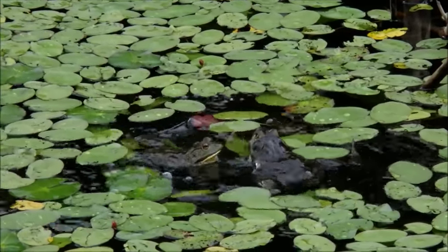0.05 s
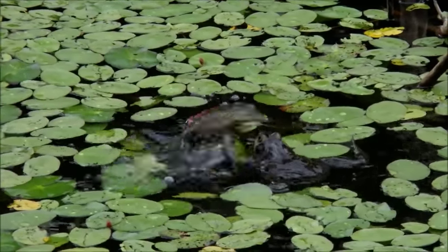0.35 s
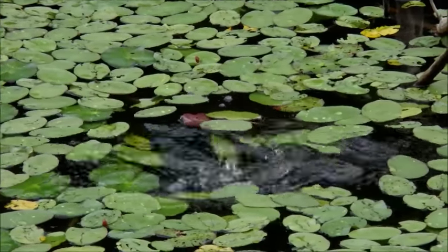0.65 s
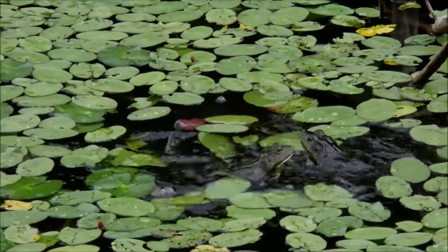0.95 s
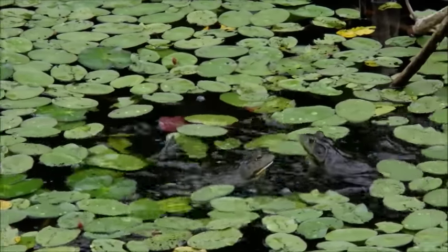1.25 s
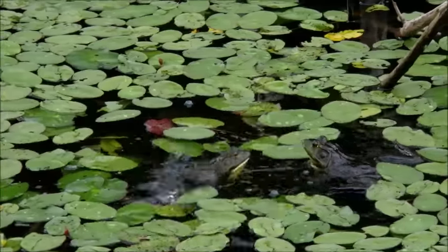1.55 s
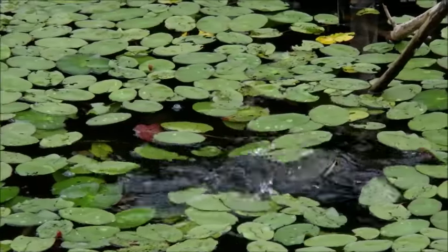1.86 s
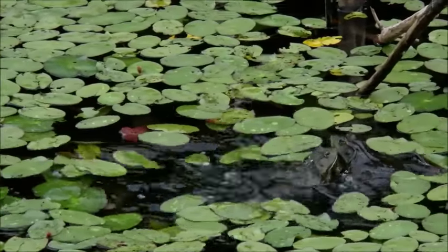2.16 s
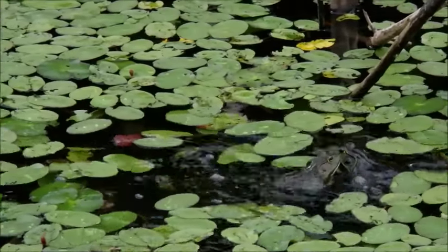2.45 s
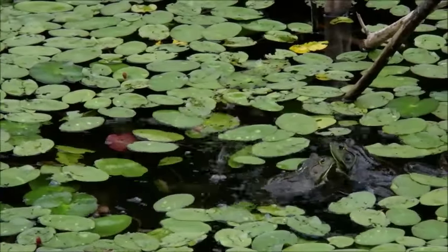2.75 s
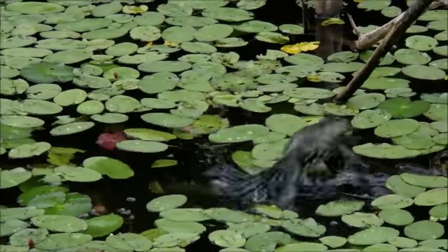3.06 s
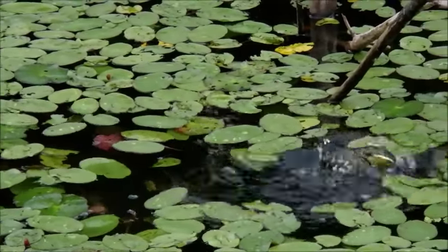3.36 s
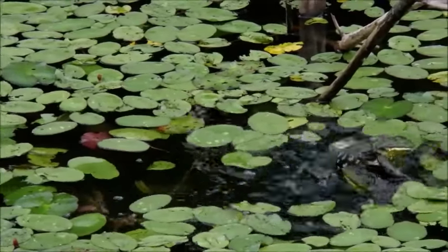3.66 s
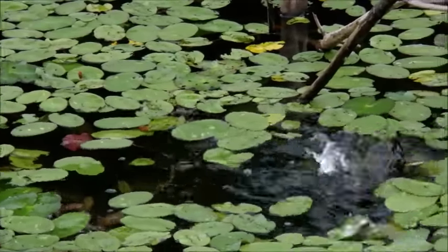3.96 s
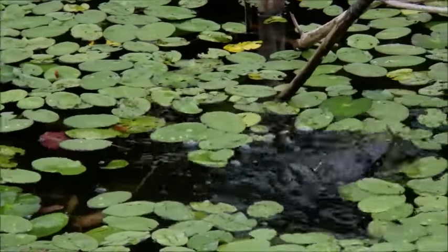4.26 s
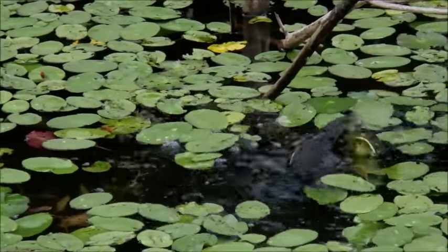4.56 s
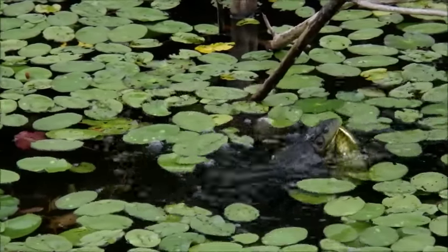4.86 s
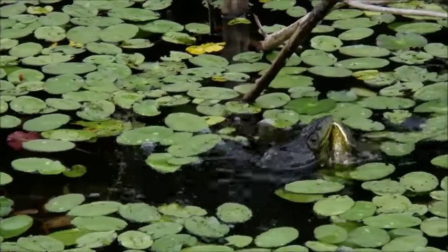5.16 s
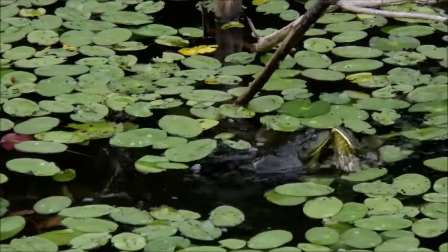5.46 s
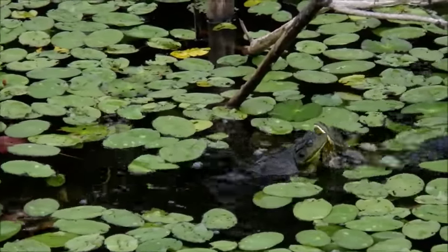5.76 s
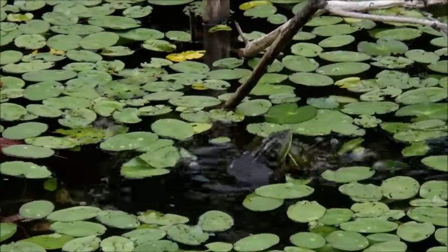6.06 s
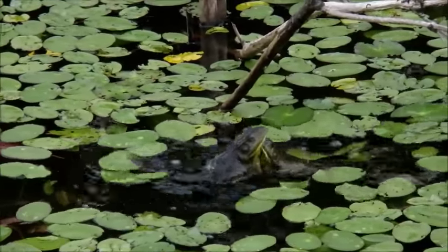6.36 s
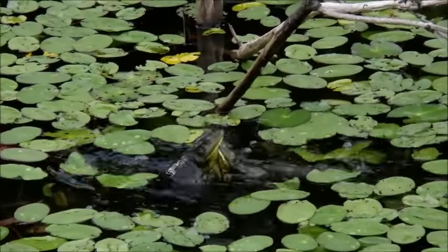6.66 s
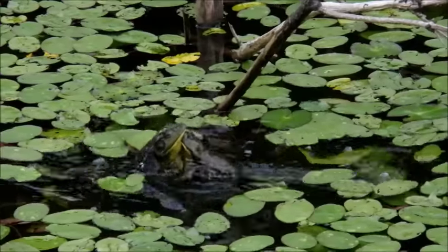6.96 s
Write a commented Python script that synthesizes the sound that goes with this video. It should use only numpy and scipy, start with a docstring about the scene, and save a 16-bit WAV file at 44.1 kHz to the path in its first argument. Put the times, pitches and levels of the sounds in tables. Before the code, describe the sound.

Gusts of wind buffet the microphone while frogs make small splashes in a pond, over a steady hiss of leaves and a distant hum.

```python
"""A lily pond, heard from a hand-held camera. Some metres off, two frogs wrestle among the pads:
skin slaps water, spray falls back, trapped air rings. Foliage hisses all round over a far hum.
Close up, gusts buffet the two microphone ports one by one, and the hardest buffets make the
camera's limiter duck everything, which then creeps back."""
import sys
import numpy as np
from scipy import signal
from scipy.fft import rfft, irfft, next_fast_len
from scipy.io import wavfile
from scipy.ndimage import uniform_filter1d, minimum_filter1d, map_coordinates

SR = 44100
rng = np.random.default_rng(int(sys.argv[2]) if len(sys.argv) > 2 else 0)


def inscribe(sig):
    """Save sig as 16-bit PCM at rate SR to the path in sys.argv[1].

    A 1-D sig is mono; a 2-D sig holds one channel per row.
    Samples are clipped to [-1, 1] before scaling.
    """
    pcm = np.round(np.clip(np.atleast_2d(sig).T, -1, 1) * 32767)
    wavfile.write(sys.argv[1], SR, pcm.astype(np.int16))


N = 309141
TIME = np.arange(N) / SR
FREQS = np.arange(N // 2 + 1) * SR / N
TOP_HZ = 15750  # upper edge of the camera's sound

# Frogs slapping the water. Each row: start in seconds, level in dB, centre in Hz, decay in seconds.
FROG_SLAPS = [(0.729, -31, 5400, .0025), (0.747, -26.5, 6500, 0.0012), (0.748, -27.5, 1940, 0.00076),
              (0.746, -28, 690, 0.0025), (0.759, -27.5, 4800, .002), (0.766, -34, 2300, .0012),
              (0.782, -30, 2590, .0012), (0.832, -30.5, 6550, 0.00075), (0.834, -31, 3600, .0015),
              (2.075, -30, 4677, 0.012), (2.079, -17.5, 6900, 0.00064), (3.559, -22.5, 3060, 0.00091),
              (3.57, -29.5, 5000, 0.003), (3.594, -32, 9010, 0.00074), (3.612, -33, 4660, 0.0044),
              (3.633, -22, 7608, 0.0012), (3.634, -22, 5100, 0.0011), (4.207, -30, 3560, 0.0021),
              (4.241, -29, 4500, 0.0013), (4.287, -28.5, 3225, .0012), (4.31, -40, 5140, 0.015),
              (5.262, -31.5, 6600, 0.0033)]
# Air pockets closing. Each row: start in seconds, level in dB, pitch in Hz, rise in octaves per decay.
AIR_POCKETS = [(0.744, -39.5, 312, .05), (0.779, -40, 1420, 0.14), (0.781, -35, 1980, 0.11),
               (0.815, -46, 1440, .03), (0.834, -41, 3220, 0.039), (0.878, -34, 2085, .02),
               (1.780, -46, 2110, .02), (3.357, -32, 5470, 0.019), (3.363, -42, 2105, 0.03),
               (3.623, -40, 2830, 0.047), (3.632, -31, 4053, .02), (4.159, -37.5, 834, 0.14),
               (4.171, -45, 1089, 0.26), (4.208, -45.5, 2056, 0.03), (4.317, -45.5, 2626, 0.019)]

# Gusts on the microphone. Each row: start in seconds, length in seconds, level at the windward port
# in dB, left minus right in dB.
GUSTS = [(1.266, 0.18, -54.5, -13), (1.576, 0.044, -42, -10), (1.638, 0.047, -31, -9),
         (1.701, 0.038, -34, -3), (1.79, 0.12, -42, -2), (1.939, 0.03, -36, -12.5), (2.139, 0.033, -27, 2),
         (2.188, .17, -22.5, -14), (2.384, 0.13, -22.5, 3), (2.533, 0.05, -17, 11), (2.581, 0.069, -31, 8),
         (2.712, 0.023, -15.5, 18), (2.758, 0.061, -14.5, 13.5), (2.835, 0.036, -17, -8),
         (2.883, 0.074, -21, 14), (2.983, 0.039, -26, 8), (3.029, 0.064, -35, 5.5), (3.144, 0.072, -24, 18),
         (3.225, .15, -29, 0), (3.39, .15, -36, -6), (3.57, 0.063, -26, 0), (3.639, .14, -20.5, 3),
         (3.815, 0.043, -26.5, 7), (3.861, .07, -33, 13.5), (3.933, .12, -20.5, 8.5),
         (4.077, .066, -32, -2), (4.186, 0.039, -27, -11.5), (4.239, 0.061, -33, -5),
         (4.296, 0.075, -22.5, -12), (4.387, 0.11, -20, 9), (4.494, 0.086, -26, -5),
         (4.604, 0.06435, -20, 6), (4.699, .085, -23, 3), (4.819, 0.23, -34, -6), (5.103, 0.032, -26, -7),
         (5.152, 0.098, -29, -5), (5.508, 0.029, -36, -17.5), (5.563, 0.044, -38, 8),
         (5.615, 0.079, -34, 6), (5.758, 0.046, -37.5, 4), (5.801, .025, -31.5, -8.5),
         (5.86, 0.11, -40, -3), (5.987, 0.11, -29, 5.5), (6.106, 0.066, -40, 4), (6.209, 0.031, -38, 2.5),
         (6.278, 0.064, -47.5, -2.5), (6.52, 0.094, -48.5, 5), (6.74, 0.032, -40, 3),
         (6.78, 0.056, -40, -4.5)]
# The hardest eddies to hit a port. Each row: time in seconds, level in dB, pitch in Hz,
# left minus right in dB.
BUFFETS = [(0.083, -37, 120, -23), (.182, -38, 130, -14), (0.226, -35, 130, -22), (0.282, -36, 118, -17),
           (0.547, -33, 125, -23), (0.576, -36, 120, -16), (1.65, -27, 124, -18), (1.659, -26, 201, -20),
           (1.72, -24, 228, -11), (2.005, -20, 169, -30), (2.085, -18.5, 225, 25), (2.103, -16.5, 232, -17),
           (2.144, -24, 190, 8), (2.168, -4.5, 230, -20), (2.174, -1.5, 278.9, -35), (2.278, -11, 186, -16),
           (2.396, -9.5, 170.1, -15), (2.422, -10.5, 269.8, 12), (2.431, -8, 278, 16),
           (2.464, -9.5, 170.2, 21), (2.476, -5.5, 282, 29), (2.487, -5.5, 292.9, 16), (2.501, 5, 328, 3),
           (2.514, -2, 269, 5.5), (2.533, -8.5, 291.6, 19), (2.548, -9.5, 232, -10),
           (2.573, -10.5, 421, 21), (2.631, -11, 400, 14), (2.638, -6, 259, 11), (2.68, -8.5, 310, 25.5),
           (2.699, -16.5, 360, 15), (2.721, -10.5, 212.1, 24), (2.741, -6.5, 363.5, 18),
           (2.769, -8.5, 348, 10), (2.804, -5.5, 313.2, 4.5), (2.816, -4.5, 383.4, 8.5),
           (2.843, -11.5, 348, -16), (2.869, -4.5, 211.5, -15.5), (2.908, -5.5, 249, 22),
           (2.935, -8, 410, 21.5), (2.956, -11, 315, 16), (3.064, -19, 180.5, 16.5),
           (3.185, -12.5, 150.7, 18.5), (3.239, -17, 150.2, -1.5), (3.368, -12.5, 189.1, -25),
           (3.582, -19.5, 199.5, 2), (3.645, -12.5, 301, 26), (3.654, -0.8, 270, 22), (3.673, -8, 229, -6),
           (3.72, -7, 195, 6), (3.757, -9, 190.4, 15.5), (3.94, -9, 189.2, 24), (3.99, -6, 198.7, 20),
           (4.004, -11, 210.1, 11.5), (4.047, -12, 230.6, -13.5), (4.19, -22.5, 151.1, -16),
           (4.215, -15, 213.3, -25), (4.314, -8, 197.6, -25), (4.336, -15, 230.5, -18),
           (4.365, -13.5, 257.4, -17), (4.4, -1.5, 320, 32), (4.434, -5, 291.3, 8), (4.442, 3.5, 364, 30),
           (4.478, -9.5, 358, 19.5), (4.607, -7, 321.2, -13), (4.657, -7.5, 187.8, 21.5),
           (4.708, -10.5, 190, 18), (4.783, -18, 169.9, -21), (5.012, -14, 211.5, 9), (5.114, -1, 299, -26),
           (5.187, -15, 201, -13.5), (5.228, -14, 260, -8), (5.543, -19.5, 160.1, -28),
           (5.73, -19.5, 150.1, 7), (5.816, -16.5, 180.8, -7.5), (5.907, -13.5, 258.7, 26),
           (6.001, -23, 279.3, 16), (6.013, -10.5, 238.3, 22), (6.07, -16, 209.2, 18),
           (6.23, -25, 178.8, 9), (6.42, -35.5, 138.4, 10), (6.471, -29, 177.3, -8),
           (6.594, -32, 138.8, 19.5), (6.736, -26.5, 159.4, 17), (6.773, -20, 158.1, -6),
           (6.798, -19.5, 167.9, -18)]
# Wind rumble at its usual speed. Each row: frequency in Hz, relative level in dB.
WIND_SPECTRUM = [(20, -24), (55, -1), (95, 2.5), (170, 2), (260, -8), (380, -18.5), (520, -32.5),
                 (750, -52), (1400, -63), (4000, -100)]
# The snap of an overloaded port. Each row: frequency in Hz, relative level in dB.
SNAP_SPECTRUM = [(300, -18), (750, 18), (1400, -3), (3200, -1), (6000, -11), (15000, -25)]

# Foliage all round. Each row: frequency in Hz, relative level in dB.
LEAF_SPECTRUM = [(740, -56), (1250, -10), (1560, -6.5), (1760, -4.5), (1920, -5), (2130, -3.5), (2320, -5),
                 (3160, -1), (3480, 2.5), (3910, 3), (6260, 1.5), (8620, -2), (12900, -14), (14700, -13.5),
                 (16000, -22)]
# The breeze in that foliage. Each row: time in seconds, hiss level in dB.
LEAF_LEVEL = [(0, -47), (.9, -47), (1.9, -48), (3.5, -45.5), (4, -48.5), (5, -47), (5.7, -49.5),
              (6.3, -50.5), (7, -50)]
# How alike the hiss is at the two ports. Each row: frequency in Hz, correlation.
LEAF_LIKENESS = [(1000, 0.92), (2400, 0.68), (4400, 0.71), (8000, 0.45), (15000, 0.058)]
# The far hum before it rises in pitch. Each row: frequency in Hz, relative level in dB.
HUM_SPECTRUM = [(30, -2), (70, 7.5), (240, 0), (315, 4), (430, -2), (510, 3.5), (605, 6), (690, 5),
                (790, -3), (930, 1.5), (1010, 1.5), (1160, -8.5), (1600, -17)]
# The hum's slow rise and fall. Each row: time in seconds, level in dB.
HUM_LEVEL = [(0, -51.5), (.4, -51), (.55, -51), (1.3, -51.5), (1.7, -52.5), (3.5, -49.5), (4, -52.5),
             (5, -51), (6.2, -53.5), (6.33, -50), (6.37, -54), (7, -52)]
# Faint tones in the hum. Each row: pitch in Hz, level before the swell in dB.
WHINE_TONES = [(316, -68.5), (592, -60), (651, -64), (947, -72), (1012, -67)]
# The tones swell and recede together. Each row: time in seconds, gain in dB.
WHINE_SWELL = [(0, -8), (.2, 0.5), (.47, 7.5), (.6, -7), (1.5, 2), (2.5, -26), (7, -8)]


def frogs(spray_db=-24, spray_s=0.057, drop_hz=4200, drop_octaves=0.52, drop_cycles=4, drops=12):
    """Frogs some metres off: each slap throws droplets that fall back; trapped air rings."""
    out = np.zeros(N)
    for start, db, hz, decay in FROG_SLAPS:
        add(out, start, undb(db) * slap(hz, decay))
        for late, pitch, size in rng.standard_normal((drops, 3)):
            ring_hz = min(drop_hz * 2 ** (pitch * drop_octaves), TOP_HZ)
            droplet = bubble(ring_hz, drop_cycles / ring_hz, rise=0.017)
            add(out, start + spray_s * abs(late), undb(db + spray_db + 0.98 * size) * droplet)
    for start, db, hz, rise in AIR_POCKETS:
        decay = 0.0047 * (2000 / hz) ** 0.45  # smaller bubbles die sooner
        add(out, start, undb(db) * bubble(hz, decay, rise))
    return out


def slap(hz, decay, spread=1.46, rise_s=0.00016, wash_db=-23, wash_s=0.021):
    """A wet crack as skin meets water, then a short wash."""
    t = np.arange(SR // 10) / SR
    band = signal.butter(2, [hz / spread, min(hz * spread, SR * 4 / 9)], "band", fs=SR, output="sos")
    grain = signal.sosfilt(band, rng.standard_normal(len(t)))
    swell = (np.exp(-t / decay) + undb(wash_db) * np.exp(-t / wash_s)) * (1 - np.exp(-t / rise_s))
    return grain / grain.std() / 2 * swell / swell.max()


def bubble(hz, decay, rise):
    """A ringing air pocket; its pitch climbs as it nears the surface."""
    t = np.arange(int(5 * decay * SR)) / SR
    pitch = hz * 2 ** (rise * np.minimum(t / decay, 2))
    envelope = np.exp(-(t / decay) ** 2 / 2) * (1 - np.exp(-t * hz / 2))
    return np.sin(2 * np.pi * np.cumsum(pitch) / SR) * envelope


def tree_echo(sound, echo_db=-15, t60=0.16):
    """The direct sound, plus a faint echo from the trees round the pond, different at each port."""
    t = np.arange(SR // 2) / SR
    tail = rng.standard_normal((2, len(t))) * np.exp(-np.log(1000) * t / t60)
    tail /= np.sqrt(np.sum(tail ** 2, axis=1, keepdims=True))
    echo = signal.fftconvolve(sound[None], tail, axes=1)[:, :N]
    return sound * sides(-0.58) + undb(echo_db) * echo


def gust_levels(lull_db=-70.5, attack_s=0.00703, release_s=0.017, wake_db=-23, wake_s=0.36,
                churn_db=-13.5, churn_s=0.009):
    """Wind in dB at each port: gusts rise, hold and leave a weak wake; air churns round each buffet."""
    force = np.full((2, N), undb(lull_db))
    for start, length, db, pan_db in GUSTS:
        before, after = np.maximum(start - TIME, 0), np.maximum(TIME - start - length, 0)
        attack = np.exp(-before / attack_s)
        release = np.maximum(np.exp(-after / release_s), undb(wake_db) * np.exp(-after / wake_s))
        force = np.maximum(force, undb(db) * attack * release * windward(pan_db))
    for at, db, _, pan_db in BUFFETS:
        churn = undb(db + churn_db) * np.exp(-np.abs(TIME - at) / churn_s)
        force = np.maximum(force, churn * windward(pan_db))
    return 20 * np.log10(force)


def port_rumble(wind_db, usual_db=-30, db_per_octave=21, flutter_db=3.0, cap_db=-17.0):
    """Eddies drift across a port: faster air is louder, up to a point, and higher in pitch."""
    force_db = wind_db + flutter_db * walk(110)
    speed = np.clip(2 ** ((force_db - usual_db) / db_per_octave), 0.6, 2)
    eddies = at_speed(noise(WIND_SPECTRUM, size=2 * N), speed)
    return eddies * undb(np.minimum(force_db, cap_db) + 0.5)


def small_eddies(wind_db, over_db=5, scatter_db=3.5, cap_db=-20, count=150, lead_s=0.02):
    """Lone eddies come at random and stand out of the wind that carries them; a harder one is quicker."""
    out = np.zeros(N)
    t = np.arange(int(2 * lead_s * SR)) / SR - lead_s
    for at, size in zip(rng.uniform(lead_s, TIME[-1], count), rng.standard_normal(count)):
        db = min(wind_db[int(at * SR)] + over_db + scatter_db * size, cap_db)
        hz = 285 * 2 ** (db / 33)  # an octave lower for every 33 dB weaker
        add(out, at - lead_s, rng.choice([-1, 1]) * undb(db) * pressure_swing(t, hz))
    return out


def buffets(overload_db=-6, snap_db=-6, lead_s=0.02):
    """Hard eddies hit mostly one port; the hardest overload it and the crest caves in with a dull snap."""
    out = np.zeros((2, N))
    t = np.arange(int(2 * lead_s * SR)) / SR - lead_s
    colour = undb(over_hz(SNAP_SPECTRUM, np.fft.rfftfreq(len(t), 1 / SR)))
    snap = np.fft.fftshift(irfft(colour, len(t)))
    snap *= undb(snap_db) / snap.max()
    for at, db, hz, pan_db in BUFFETS:
        excess = max(1 - undb(overload_db - db), 0)
        polarity = rng.choice([-1, 1])
        thump = pressure_swing(t, hz) - excess * snap
        add(out, at - lead_s, polarity * undb(db) * thump * windward(pan_db))
    return out


def pressure_swing(t, hz, width_cycles=0.31, skew_rad=0.54):
    """The swing of pressure as one eddy passes the port at t = 0."""
    envelope = np.exp(-(t * hz / width_cycles) ** 2 / 2)
    return np.cos(2 * np.pi * hz * t + skew_rad * rng.standard_normal()) * envelope


def foliage(flutter_db=0.33):
    """Leaves in the breeze: a smooth hiss all round the microphone, a little to the right."""
    hiss = diffuse(LEAF_SPECTRUM, over_hz(LEAF_LIKENESS))
    return hiss * undb(curve(LEAF_LEVEL) + flutter_db * walk(12)) * sides(-1.1)


def far_hum(rise_per_s=0.011, flutter_db=0.42):
    """A hum like distant traffic, nearly alike at both ports, creeping up in pitch."""
    speed = 1 + rise_per_s * TIME
    hum = np.array([at_speed(port, speed) for port in diffuse(HUM_SPECTRUM, likeness=0.94)])
    return hum * undb(curve(HUM_LEVEL) + flutter_db * walk(21))


def far_whine(waver=0.006, flicker_db=2.0):
    """Thin wavering tones, like a far motor."""
    tones = np.zeros(N)
    for hz, db in WHINE_TONES:
        level = undb(db - flicker_db * walk(16))
        pitch = hz * (1 + waver * walk(8))
        tones += level * np.sin(2 * np.pi * np.cumsum(pitch) / SR)
    return tones * undb(curve(WHINE_SWELL))


def whistle(hz=14804, db=-85):
    """A faint steady whistle at the very top of the hiss."""
    return undb(db) * np.sin(2 * np.pi * hz * TIME)


def diffuse(spectrum, likeness):
    """Noise from all round, partly alike at the two ports."""
    mid = irfft(rfft(noise(spectrum)) * np.sqrt((1 + likeness) / 2), N)
    side = irfft(rfft(noise(spectrum)) * np.sqrt((1 - likeness) / 2), N)
    return np.array([mid + side, mid - side])


def noise(spectrum, size=N):
    """Noise of rms 1 with the given colour."""
    padded = next_fast_len(size)
    colour = undb(over_hz(spectrum, np.fft.rfftfreq(padded, 1 / SR)))
    x = irfft(rfft(rng.standard_normal(padded)) * colour, padded)[:size]
    return x / x.std()


def walk(rate):
    """Random levels held 1 / rate seconds and smoothed twice; spread near 1."""
    hold = int(SR / rate)
    steps = np.repeat(rng.standard_normal(N // hold + 1), hold)
    return 1.2 * uniform_filter1d(uniform_filter1d(steps, hold), hold)[:N]


def at_speed(sound, speed):
    """Run through a looped sound at a changing speed; its pitch follows."""
    return map_coordinates(sound, [np.cumsum(speed)], order=1, mode="wrap")


def undb(db):
    """Decibels to gain."""
    return 10 ** (np.asarray(db) / 20)


def curve(points):
    """Timed points joined by straight lines."""
    return np.interp(TIME, *np.transpose(points))


def over_hz(points, freqs=FREQS):
    """Points joined on a log-frequency axis."""
    hz, value = np.transpose(points)
    return np.interp(np.log(freqs + 1), np.log(hz), value)


def sides(pan_db):
    """Left and right gains for a level difference, left minus right."""
    return undb(np.array([[pan_db], [-pan_db]]) / 2)


def windward(pan_db):
    """Left and right gains: the port facing the wind gets it all, the other is sheltered."""
    return sides(pan_db) / sides(pan_db).max()


def add(out, start, sound):
    """Mix a sound in at a start time in seconds."""
    i = int(start * SR)
    out[..., i:i + sound.shape[-1]] += sound[..., :max(N - i, 0)]


def scene():
    """From the camera: frogs on the pond, wind right on the microphone, leaves around, hum far off."""
    wind = np.array([port_rumble(db) + small_eddies(db) for db in gust_levels()])
    pond = tree_echo(frogs())
    background = foliage() + (far_hum() + far_whine()) * sides(0.5) + whistle()
    return pond + wind + buffets() + background


def record(dry, ceiling_db=-9.0, recovery_db_per_s=12, low_cut_hz=44):
    """The camera's limiter ducks both channels just ahead of a peak and lets go slowly; filters follow."""
    peak_db = 20 * np.log10(np.abs(dry).max(axis=0) + 1e-9)
    over_db = np.maximum(peak_db - ceiling_db, 0)
    ramp_db = recovery_db_per_s * TIME
    duck_db = np.maximum.accumulate(over_db + ramp_db) - ramp_db
    gain = uniform_filter1d(minimum_filter1d(undb(-duck_db), size=101), size=101)  # 2 ms look-ahead
    low_cut = signal.butter(2, low_cut_hz, "high", fs=SR, output="sos")
    top_cut = signal.ellip(10, 0.2, 80, TOP_HZ, fs=SR, output="sos")
    return signal.sosfilt(top_cut, signal.sosfilt(low_cut, dry * gain))


dry = scene()
out = record(dry)
inscribe(out)
```